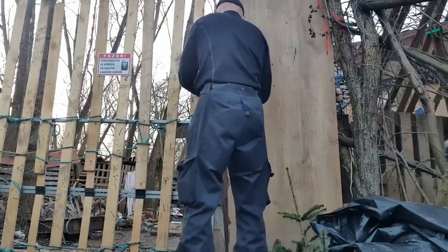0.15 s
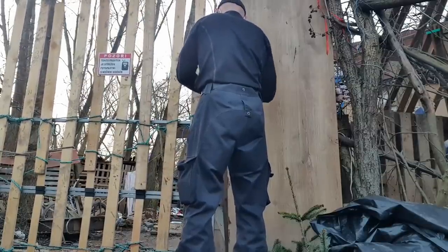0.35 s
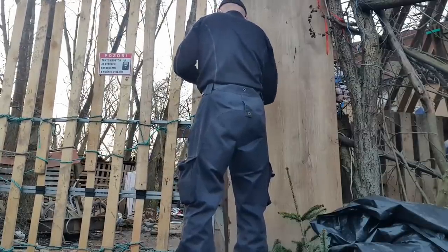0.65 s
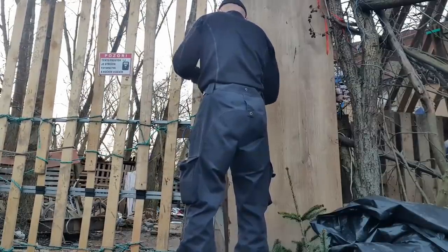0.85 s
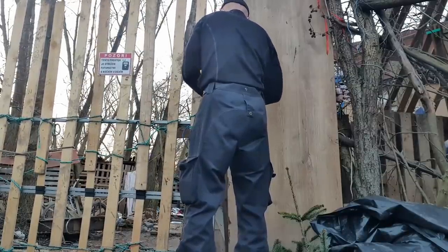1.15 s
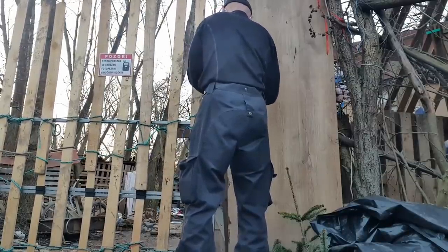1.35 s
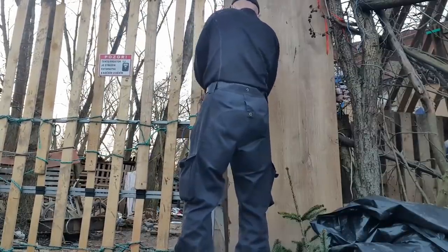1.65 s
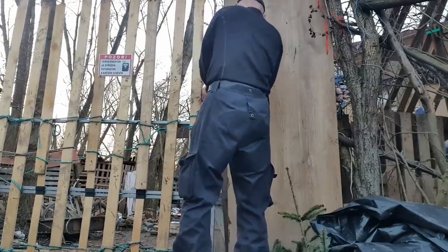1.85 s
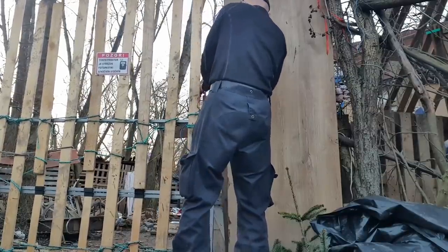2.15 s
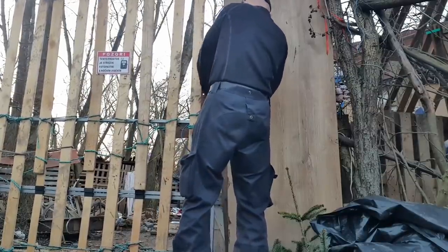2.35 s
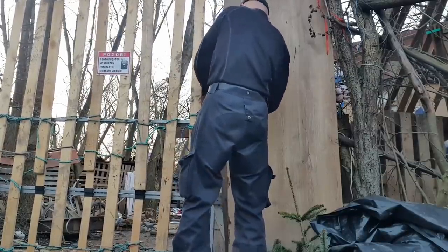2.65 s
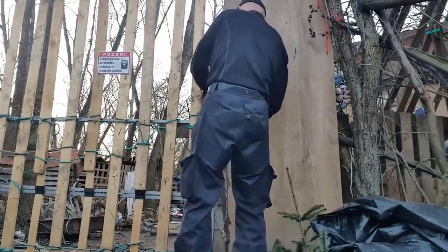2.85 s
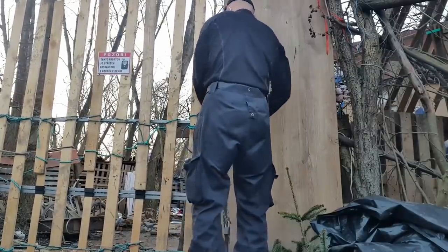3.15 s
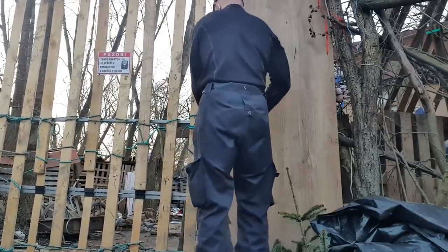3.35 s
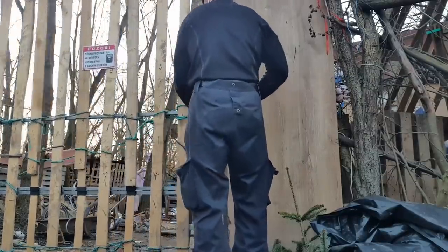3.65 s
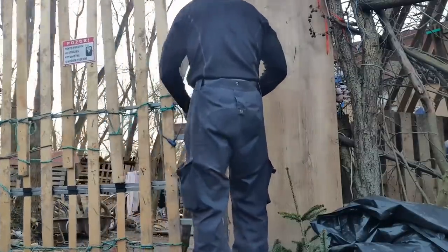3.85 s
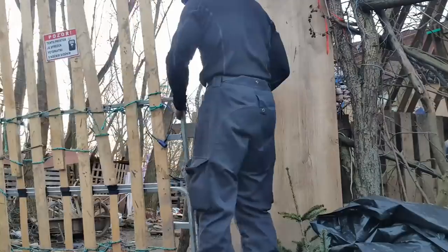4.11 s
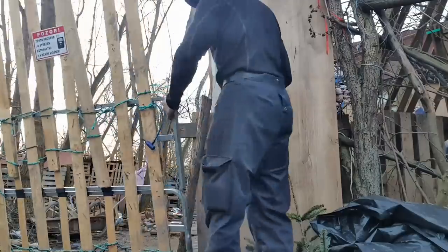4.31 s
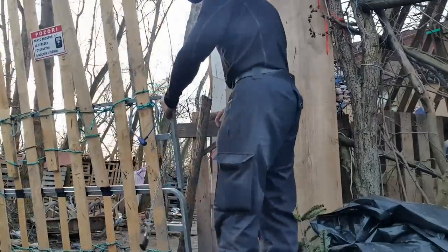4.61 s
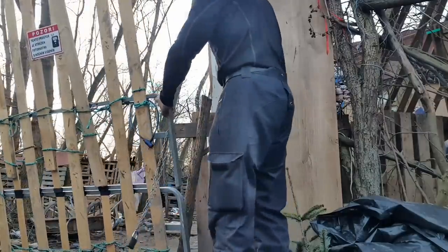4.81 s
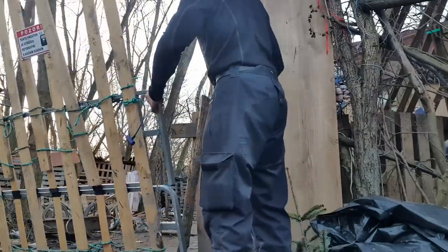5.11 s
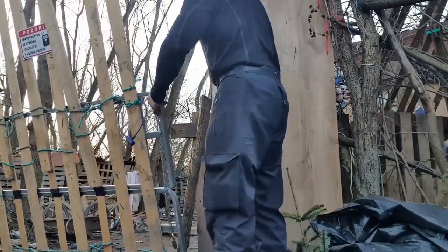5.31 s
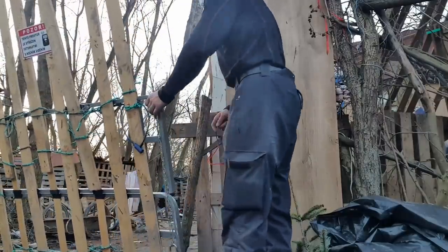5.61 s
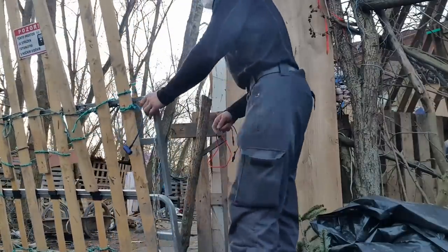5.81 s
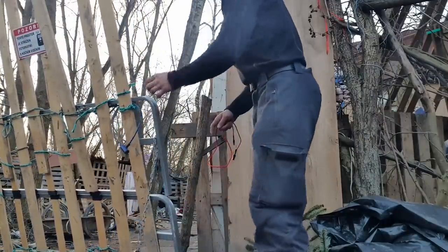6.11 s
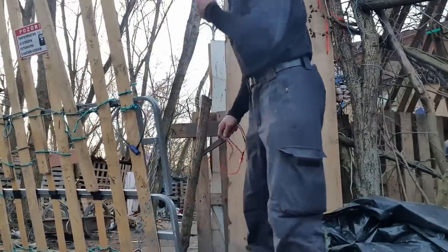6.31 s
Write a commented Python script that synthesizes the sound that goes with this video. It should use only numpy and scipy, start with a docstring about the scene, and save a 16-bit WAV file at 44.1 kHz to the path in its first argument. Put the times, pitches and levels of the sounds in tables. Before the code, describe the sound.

Outdoors in a yard, under a faint low rumble and hiss, keys tick and jingle lightly against a padlock. A chain is then pulled off in short rattling bursts with a wooden knock, and clanks hard on a steel frame. The slatted gate jolts free with a hollow bang, knocks woodenly as loose metal rings, and a bird peeps last. Close stereo microphones with uneven sides.

```python
"""A low distant rumble and a faint hiss, then keys jangle as a padlock on a garden gate is worked.
Its chain slides off and clanks on the steel frame; the slatted gate is pushed open with wooden knocks,
loose metal dangles and rings, and one small bird peeps at the end. Metal is shaped noise plus decaying
modes, wood is a noise clap over a sine push, the bird is sines, the background is coloured noise.
A faint yard echo follows the near sounds; two unlike microphones pick up the whole."""
import sys
import numpy as np
from scipy import signal
from scipy.fft import rfft, irfft, next_fast_len
from scipy.io import wavfile
from scipy.ndimage import uniform_filter1d

SR = 44100
rng = np.random.default_rng(int(sys.argv[2]) if len(sys.argv) > 2 else 0)


def put_to_file(sound):
    """Save the sound as 16-bit audio at rate SR, in the file named by the first command-line argument."""
    columns = np.atleast_2d(sound).T  # one column per channel
    safe = np.clip(columns, -1, 1)
    whole_steps = np.round(safe * 32767)
    wavfile.write(sys.argv[1], SR, whole_steps.astype(np.int16))


N = 285327

# Levels in the tables are relative: each source adds its own trim.
# far rumble and rush over time: time_s, rumble_level_db, rush_level_db
BACKGROUND_LEVELS = [(0.0, -41.5, -55.5), (0.74, -45.5, -56.5), (2.07, -44, -54.5), (2.67, -47, -52.5),
                     (2.83, -44, -54.5), (4.09, -46, -56), (4.38, -50.5, -58), (6.47, -44.5, -57)]
# noise colours of far rumble, rush and microphone hiss: freq_hz, density_db (per Hz)
RUMBLE_COLOUR = [(15, -46.5), (25, -36), (38, -9.5), (50, 0.5), (62, 2), (80, -2), (105, -5.5),
                 (134, -14.5), (200, -21.5), (400, -32), (1000, -71)]
RUSH_COLOUR = [(60, -25), (160, 0), (230, -7), (254, 8), (280, -9), (380, -7), (550, -9), (750, -11.5),
               (1070, -12), (1500, -18.5), (3000, -43), (7000, -50), (16000, -47)]
HISS_COLOUR = [(400, -1), (1500, 0), (2500, 1.5), (3800, 5), (4700, -3.5), (5600, -9), (7300, -31),
               (10000, -23), (16000, -41)]

# keys striking the padlock: start_s, level_db, edge_db (bright edge re strength)
KEY_BLOWS = [(0.445, -50, -3), (0.474, -45.5, -2.5), (0.535, -46, 1.5), (0.792, -47, -8),
             (0.819, -47.5, 7.5), (0.866, -51, 6.5), (1.185, -46, 7), (1.251, -50.5, 3), (1.358, -50, 8),
             (1.399, -49.5, 8.5), (1.425, -49, -5), (1.58, -50, -0.5), (1.732, -53, -3), (1.778, -59, -7)]
# knocks of the wooden slats: start_s, level_db, pitch_hz
SLAT_KNOCKS = [(1.783, -53, 885), (2.245, -39, 606), (2.494, -31, 277), (4.046, -26, 435),
               (4.204, -37, 520), (4.282, -27.5, 136), (4.286, -50.5, 1020), (4.395, -56, 800),
               (4.695, -26.5, 187), (4.945, -39.5, 720), (5.3191, -22.5, 304), (5.324, -27.5, 510),
               (5.689, -39.5, 675)]
# pulls drawing the chain over the frame: start_s, length_s, level_db
CHAIN_PULLS = [(2.186, 0.032, -42.5), (2.298, 0.031, -37.5), (2.39, 0.055, -48), (2.468, .035, -42.5),
               (2.615, 0.28, -38.5), (2.768, 0.046, -25.5), (2.856, 0.032, -25.5), (3.217, 0.072, -55.5),
               (3.511, 0.054, -35.5)]
# single links dropping against each other: start_s, level_db
LINK_DROPS = [(2.228, -58), (2.279, -42), (2.778, -41.5), (2.897, -40.5), (3.058, -56), (3.172, -48),
              (3.288, -55.5), (3.358, -54), (3.577, -44)]
# gate rubbing a hollow post: start_s, level_db
POST_RUBS = [(2.456, -41), (2.464, -46), (2.478, -47), (2.493, -50)]
# loose metal swinging against the gate: start_s, level_db, ring_db (re clack)
DANGLE_BLOWS = [(3.596, -47, 19), (3.872, -57.5, 1), (3.918, -55, 8.5), (4.005, -45, 6), (4.042, -37, 15.5),
                (4.21, -58.5, 8), (4.55, -49.5, 10.5), (4.588, -51.5, 5.5), (4.62, -73, 8),
                (4.887, -66, -2), (5.332, -47, 2), (5.381, -39, 0.5), (5.393, -43.5, -6),
                (5.496, -45.5, -19), (5.607, -47, 7.5), (5.718, -47, -3), (5.742, -46.5, -3),
                (5.783, -51, 8), (5.84, -54.5, 6)]
# lock and chain hitting the steel frame: start_s, level_db, ring_db (re clack), edge_db (re clack)
FRAME_BLOWS = [(3.614, -29.5, -16, 7.5), (3.624, -21.5, -4, 3.5), (3.638, -15.5, -8, -16.5),
               (3.687, -30.5, -29, -13.5), (3.730, -38.5, -31, -17), (4.039, -32.5, 8.5, -5.5)]
# bird's slurred note, as a contour: time_s, pitch_hz, level_db
BIRD_NOTE = [(6.345, 6160, -76), (6.352, 4950, -67), (6.358, 4200, -57), (6.376, 4480, -63),
             (6.392, 4110, -55), (6.412, 4160, -54), (6.425, 3800, -59), (6.45, 3350, -70)]
# thin far notes before it: start_s, length_s, pitch_hz, level_db
BIRD_PEEPS = [(6.025, 0.037, 4960, -65.5), (6.092, 0.053, 4870, -65), (6.1, 0.038, 5180, -64.5)]

# lasting modes of each body, levels scattered per blow: freq_hz, level_db, t60_s
KEY_BODY = [(1770, -21, .1), (3720, -7, .07), (3930, -2, .08), (4080, 0, .09), (4865, -8, .13),
            (5480, -18, .1), (5809, -14, .09), (8890, -14, .14), (10700, -19, .09)]
LINK_BODY = [(1833, -13, 0.54), (2550, 2.5, 0.047), (2995, -13, 0.16), (3960, 5, 0.13),
             (3760, -12.5, 0.057), (4910, 0, 0.21), (5290, -7, 0.09), (5760, -15, 0.3), (8720, -7, 0.05)]
POST_BODY = [(510, -8, 0.056), (838, 3, 0.087), (860, -10, 0.033), (1060, 0, 0.044)]
DANGLE_BODY = [(3004, -22, .12), (4560, -10, .05), (4705, -6, .24), (4760, -4, .26), (4818, 0, .16),
               (4950, -4, .07), (5150, -4, .06), (5380, -9, .05), (8882, -12, .16)]
FRAME_BODY = [(716, -16, .28), (1012, -5, .22), (1240, -3, .2), (1475, -7, .2), (1760, -11, .2),
              (2026, -2, .18), (2158, -2, .18), (2290, -8, .16), (2525, -9, .18), (2864, -7, .14),
              (3043, -5, .15), (3287, -3, .14), (3720, -6, .15), (3931, -6, .12), (4705, -4, .22),
              (4962, -4, .15), (5462, -7, .16), (11374, -8, .06), (12888, -6, .06), (13900, -9, .06)]

# colours of dense modes: small metal and its edge, wood clap, frame and its edge, hollow frame bang:
# freq_hz, density_db (per Hz)
CLACK_COLOUR = [(150, -17), (350, -14), (600, -22), (1100, -7.5), (1900, -4.5), (3500, -1.5), (5400, -5.5),
                (6400, -12), (7400, -24), (10000, -39)]
EDGE_COLOUR = [(4000, -21.5), (6500, -7.5), (7800, -13), (9000, 2), (10500, -5), (12500, -7.5),
               (15500, -10)]
CLAP_COLOUR = [(150, -11), (400, -2.5), (850, -3), (1500, -4.5), (2800, -6.5), (5000, -19.5), (7500, -39),
               (9500, -22.5), (15000, -44)]
CLANG_COLOUR = [(150, -24.5), (500, -19), (950, -22), (1300, -5.5), (2000, -1), (3600, 1), (5400, -1.5),
                (6500, -7.5), (7500, -21.5), (10000, -59.5)]
CRASH_COLOUR = [(4000, -40.5), (6500, -6.5), (7600, -21), (9000, -2), (10500, -7), (11400, 0),
                (13000, -3.5), (14200, -9.5), (15500, -8)]
BANG_COLOUR = [(150, -22), (500, 0), (750, -20), (1000, -3), (1500, 0.5), (2150, 2.5), (3200, -13),
               (4000, -37), (6000, -21), (9000, -39)]

# left-right correlation of noise: freq_hz, likeness (0 to 1)
STEREO_LIKENESS = [(60, 1), (130, 0.94), (300, 0.93), (1000, 1), (2200, 0.83), (5000, 0.28), (9000, 0.071)]
# microphone imbalance: freq_hz, left_minus_right_db
MIC_BALANCE = [(100, 0.2), (350, 1.5), (1000, 8), (2200, 12), (3800, 13.5), (4900, 5.5), (6500, -1),
               (7600, -14.5), (9500, -16.5), (12500, -5), (15000, -2)]

RING_S = np.arange(SR // 2) / SR  # time after a blow
HARD_HZ = 7000  # modes from here up follow the bright edge
MODE_SPREAD_DB = 3
# a key struck above this level rings more than it clacks, by so many dB per dB
KEY_FREE_DB, KEY_RING_DB_PER_DB = -50, 2.62
# a key grazes the lock this long before it strikes, so much weaker
GRAZE_S, GRAZE_LOSS_DB = 0.013, 17.5
# knock pitch where clap trim alone sets the clap; a higher, harder knock claps more
CLAP_EVEN_HZ, CLAP_DB_PER_OCTAVE = 556, 15.5
# chain gets going quickly, settles once the hand stops
PULL_ATTACK_S, SETTLE_DB_PER_S = 0.035, 243
CHAIN_LAG_S = 0.006  # chain lands this long after the lock
JOLT_S = 4.039  # gate comes free
TOP_HZ = 15800


def amp(db):
    """Decibels to gain."""
    return 10 ** (np.asarray(db) / 20)


def unit(x):
    """Scale to rms 1."""
    return x / np.sqrt(np.mean(x ** 2) + 1e-20)


def along(points, hz):
    """Interpolate (Hz, value) points on a log frequency axis."""
    f, v = np.transpose(points)
    return np.interp(np.log(hz + 1), np.log(f + 1), v)


def curves(rows):
    """One value per sample for each column after the time."""
    s, *cols = np.transpose(rows)
    return [np.interp(np.arange(N) / SR, s, c) for c in cols]


def filtered(x, response):
    """Filter x by a response of frequency."""
    n = x.shape[-1]
    m = next_fast_len(n + SR // 8)
    return irfft(rfft(x, m) * response(np.fft.rfftfreq(m, 1 / SR)), m)[..., :n]


def noise(colour, size):
    """Coloured stereo noise of rms 1, alike in the bass and nearly unrelated in the treble."""
    def mid_side_gain(hz):
        # mid power minus side power sets the left-right correlation
        angle = np.arccos(np.clip(along(STEREO_LIKENESS, hz), -1, 1)) / 2
        return amp(along(colour, hz)) * [np.cos(angle), np.sin(angle)]
    mid, side = filtered(rng.standard_normal((2, size)), mid_side_gain)
    return unit(np.array([mid + side, mid - side]))


def add(track, start_s, sound):
    """Mix a sound in at a time."""
    part = track[:, max(round(start_s * SR), 0):][:, :sound.shape[-1]]
    part += sound[:, :part.shape[-1]]


def fade(t60_s):
    """Free exponential decay after a blow."""
    return 10 ** (-3 * RING_S / max(t60_s, 1e-3))


def cloud(colour, ripple_db, spacing_hz):
    """Densely packed modes: every blow favours a different comb of them."""
    knots = np.clip(rng.standard_normal(2048), -2, 1.3)

    def comb(hz):
        return amp(ripple_db * np.interp(hz / spacing_hz, np.arange(len(knots)), knots))
    return unit(filtered(noise(colour, len(RING_S)), comb))


def ring(modes, bright_db=0, detune=0, phase_spread=0.67):
    """A blow's energy is shared anew among the modes; only a hard contact wakes the highest ones."""
    low, high = np.zeros((2, 2, len(RING_S)))
    for hz, db, t60_s in modes:
        # phase differs a little between left and right
        phase = rng.uniform(0, 2 * np.pi) + phase_spread * rng.standard_normal((2, 1))
        pitch_hz = hz * (1 + detune * rng.standard_normal())
        gain = amp(db + MODE_SPREAD_DB * rng.standard_normal())
        partial = gain * fade(t60_s) * np.sin(2 * np.pi * pitch_hz * RING_S + phase)
        if hz < HARD_HZ:
            low += partial
        else:
            high += partial
    onset_rms = np.sqrt(np.mean(low[:, :SR // 100] ** 2))
    return (low + amp(bright_db) * high) / onset_rms


def rebounding(rows, gap_s, loss_db, scatter, count):
    """Each contact is followed by weaker rebounds at slightly uneven gaps."""
    out = []
    for s, db, ring_db, edge_db in rows:
        gaps_s = gap_s * np.exp(scatter * rng.standard_normal(count))
        times_s = s + np.cumsum([0, *gaps_s])
        out += [(at_s, db - loss_db * k, ring_db, edge_db) for k, at_s in enumerate(times_s)]
    return out


def contacts(rows, modes, colour, edge_colour, t60_s, edge_t60_s, rise_t60_s, snap, detune,
             ripple_db, clack_trim_db, ring_trim_db, edge_trim_db):
    """Metal on metal: a quickly dying cloud of dense modes, a bright edge and a few lasting modes."""
    out = np.zeros((2, N))
    # sound swells for a moment as it arrives round the body and the boards
    attack = (1 - fade(rise_t60_s)) * (1 + snap * fade(0.087))
    for s, db, ring_db, edge_db in rows:
        clack = amp(clack_trim_db) * cloud(colour, ripple_db, spacing_hz=63.75) * fade(t60_s)
        edge = cloud(edge_colour, ripple_db, spacing_hz=119.0) * fade(edge_t60_s)
        edge *= amp(edge_db + edge_trim_db)
        lasting = amp(ring_db + ring_trim_db) * ring(modes, edge_db - ring_db, detune)
        add(out, s, amp(db) * attack * (clack + edge + lasting))
    return out


def patchy(x, depth_db):
    """Narrow bands of a steady sound swell and sink on their own."""
    bands = signal.stft(x, nperseg=2048)[2]
    field = rng.standard_normal(bands.shape[1:])
    field = uniform_filter1d(field, size=2, axis=0)  # across bands
    field = uniform_filter1d(field, size=12, axis=1)  # across frames
    varied = bands * amp(depth_db * unit(field))
    return unit(signal.istft(varied, nperseg=2048)[1][:, :N])


def background(rumble_trim_db=2, rush_trim_db=2.5):
    """A far rumble, and a softer shifting rush with a faint drone in it: coloured noises."""
    rumble_db, rush_db = curves(BACKGROUND_LEVELS)
    rumble = amp(rumble_db + rumble_trim_db) * noise(RUMBLE_COLOUR, N)
    rush = amp(rush_db + rush_trim_db) * patchy(noise(RUSH_COLOUR, N), depth_db=3.5)
    return rumble + rush


def keys():
    """Keys graze the padlock, strike it and chatter; light touches tick, harder ones ring."""
    strikes = [(s, db, KEY_RING_DB_PER_DB * (db - KEY_FREE_DB), edge_db) for s, db, edge_db in KEY_BLOWS]
    grazes = [(s - GRAZE_S, db - GRAZE_LOSS_DB, ring_db, edge_db) for s, db, ring_db, edge_db in strikes]
    blows = grazes + rebounding(strikes, gap_s=0.0089, loss_db=17.5, scatter=0.17, count=1)
    return contacts(blows, KEY_BODY, CLACK_COLOUR, EDGE_COLOUR, t60_s=0.15, edge_t60_s=0.17,
                    rise_t60_s=0.011, snap=1.24, detune=0.0039, ripple_db=7.0,
                    clack_trim_db=0.5, ring_trim_db=-4, edge_trim_db=-12.0)


def slats(clap_trim_db=0.5, t60_s=0.061, push_cycles=1.45):
    """Wood knocks: a dry noise clap over one low push without ring."""
    out = np.zeros((2, N))
    for s, db, hz in SLAT_KNOCKS:
        hardness_db = CLAP_DB_PER_OCTAVE * np.log2(hz / CLAP_EVEN_HZ)
        clap = noise(CLAP_COLOUR, len(RING_S)) * fade(t60_s) * (1 - fade(0.0017))
        clap *= amp(hardness_db + clap_trim_db)
        window = np.sin(np.pi * np.clip(hz * RING_S / push_cycles, 0, 1)) ** 2
        push = np.sin(2 * np.pi * hz * RING_S) * window
        add(out, s, amp(db) * (clap + push))
    return out


def pull_speed(t):
    """Gain of the chain's motion: each pull rises, holds and settles."""
    speed = 0
    for s, length_s, db in CHAIN_PULLS:
        settled_db = db - SETTLE_DB_PER_S * np.maximum(t - s - length_s, 0)
        speed = speed + amp(settled_db) * np.clip((t - s) / PULL_ATTACK_S, 0, 1)
    return speed


def sliding_chain(ticks_per_s=400, spread_db=3.5, trim_db=-2.0, ring_trim_db=-14, edge_trim_db=-3,
                  t60_s=0.0483, link_count=10):
    """Many small contacts of a few links run together while the chain is drawn over the frame."""
    speed = pull_speed(np.arange(N) / SR)
    out = np.zeros((2, N))
    for _ in range(link_count):
        hits = rng.random(N) < ticks_per_s / link_count / SR
        ticks = hits * amp(spread_db * np.clip(rng.standard_normal(N), -2, 2))
        dense = cloud(CLACK_COLOUR, ripple_db=6, spacing_hz=87.6)
        dense += amp(edge_trim_db) * cloud(EDGE_COLOUR, ripple_db=20.5, spacing_hz=135.65)
        link = dense * fade(t60_s) + amp(ring_trim_db) * ring(LINK_BODY, detune=0.0044)
        force = unit(ticks) / np.sqrt(link_count) * speed * amp(trim_db)
        out += signal.oaconvolve(force[None], link / np.linalg.norm(link[0]), axes=1)[:, :N]
    return out


def links():
    """Single links drop, clink and rebound."""
    drops = [(s, db, 0, 0) for s, db in LINK_DROPS]
    blows = rebounding(drops, gap_s=0.012, loss_db=9.5, scatter=0.34, count=1)
    return contacts(blows, LINK_BODY, CLACK_COLOUR, EDGE_COLOUR, t60_s=0.149, edge_t60_s=0.1,
                    rise_t60_s=0.0097, snap=0.4, detune=0.01, ripple_db=8,
                    clack_trim_db=5.5, ring_trim_db=6, edge_trim_db=0)


def post_rub():
    """The gate rubs a hollow post: short soft-edged bursts of its modes."""
    out = np.zeros((2, N))
    for s, db in POST_RUBS:
        add(out, s, amp(db) * ring(POST_BODY, detune=0.0092, phase_spread=0.59) * (1 - fade(0.009)))
    return out


def dangling():
    """Loose metal swings against the moving gate, rattles and rings on."""
    swings = [(s, db, ring_db, 0) for s, db, ring_db in DANGLE_BLOWS]
    blows = rebounding(swings, gap_s=0.012, loss_db=8.5, scatter=0.15, count=1)
    return contacts(blows, DANGLE_BODY, CLACK_COLOUR, EDGE_COLOUR, t60_s=0.12, edge_t60_s=0.08,
                    rise_t60_s=0.021, snap=0.2, detune=0.00061, ripple_db=9,
                    clack_trim_db=6.0, ring_trim_db=-2, edge_trim_db=4.0)


def frame():
    """Every blow on the steel frame is a double one: first the lock, then its chain."""
    blows = []
    for s, db, ring_db, edge_db in FRAME_BLOWS:
        blows += [(s + lag_s, db, ring_db, edge_db) for lag_s in (0, CHAIN_LAG_S)]
    return contacts(blows, FRAME_BODY, CLANG_COLOUR, CRASH_COLOUR, t60_s=0.087, edge_t60_s=0.1,
                    rise_t60_s=0.003, snap=0.4, detune=0, ripple_db=11,
                    clack_trim_db=0.5, ring_trim_db=-3.0, edge_trim_db=-2)


def jolt(level_db=-19, t60_s=0.1, rise_t60_s=0.0016):
    """The freed gate jolts and its hollow tubular frame bangs: one decaying cloud of modes."""
    out = np.zeros((2, N))
    bang = cloud(BANG_COLOUR, ripple_db=5.5, spacing_hz=68.4) * fade(t60_s) * (1 - fade(rise_t60_s))
    add(out, JOLT_S, amp(level_db) * bang)
    return out


def bird(trim_db=2):
    """A few thin sine peeps, then a gliding sine that drops and wavers."""
    t = np.arange(N) / SR
    hz, db = curves(BIRD_NOTE)
    sounding = (t > BIRD_NOTE[0][0]) * (t < BIRD_NOTE[-1][0])
    song = amp(db) * np.sin(2 * np.pi * np.cumsum(hz) / SR) * sounding
    for s, length_s, pitch_hz, peep_db in BIRD_PEEPS:
        swell = np.sin(np.pi * np.clip((t - s) / length_s, 0, 1))
        song = song + amp(peep_db) * swell * np.sin(2 * np.pi * pitch_hz * t)
    return amp(trim_db) * np.array([song, song])


def yard(x, t60_s=0.31, wet_db=-13):
    """Fence, shed wall and trees scatter a short faint echo: a decaying noise tail."""
    tail = rng.standard_normal((2, len(RING_S))) * fade(t60_s) * (1 - fade(0.04))
    return amp(wet_db) * signal.fftconvolve(x, tail / np.linalg.norm(tail[0]), axes=1)[:, :N]


def scene():
    """The gate and the bird in the yard, over the background."""
    near = keys() + slats() + sliding_chain() + links() + post_rub()
    near = near + dangling() + frame() + jolt() + bird()
    return near + yard(near) + background()


def roll_off(hz):
    """Steep upper band limit, 300 Hz wide."""
    return np.clip((TOP_HZ - hz) / 300 + 0.5, 0, 1)


def record(dry, lag_s=0.0002075, left_hiss_db=-57, right_hiss_db=-77):
    """The left microphone lags, favours the midrange and hisses more; the right one favours the top."""
    halves = np.array([[0.5], [-0.5]])  # left, right share of each difference

    def microphones(hz):
        gain = amp(along(MIC_BALANCE, hz) * halves)
        delay = np.exp(-2j * np.pi * hz * lag_s * halves)
        return delay * gain / np.sqrt(np.mean(gain ** 2, axis=0))
    hiss = amp([[left_hiss_db], [right_hiss_db]]) * noise(HISS_COLOUR, N)
    return filtered(filtered(dry, microphones) + hiss, roll_off)


dry = scene()
out = record(dry)
put_to_file(out)
```